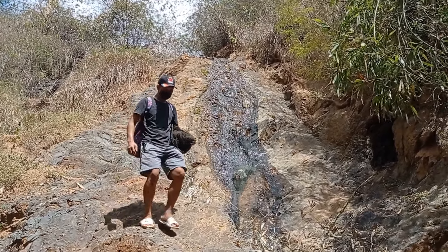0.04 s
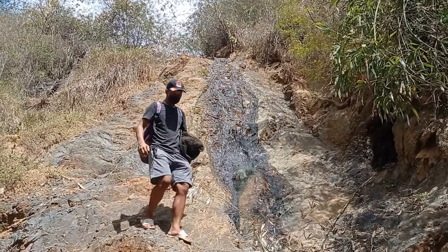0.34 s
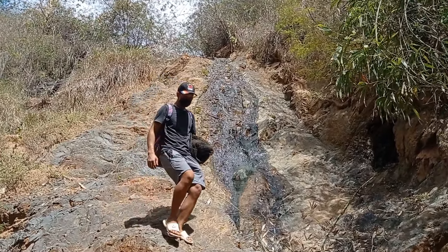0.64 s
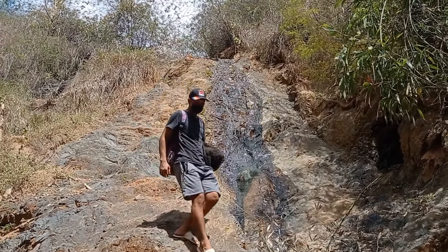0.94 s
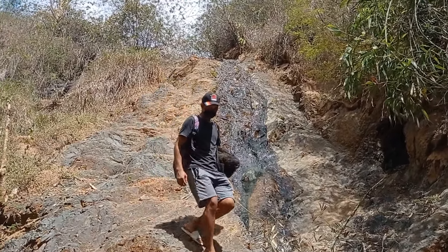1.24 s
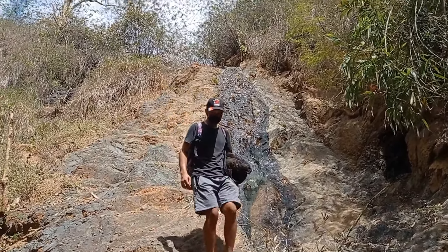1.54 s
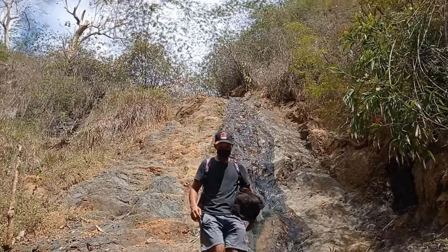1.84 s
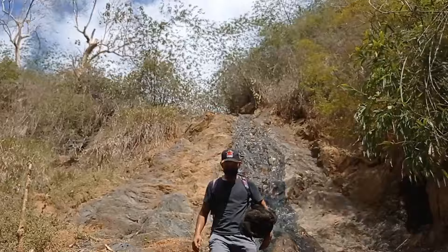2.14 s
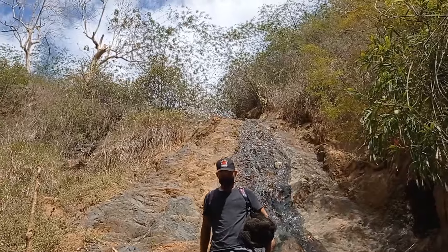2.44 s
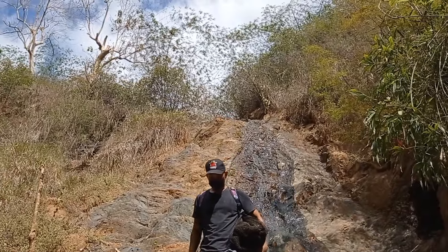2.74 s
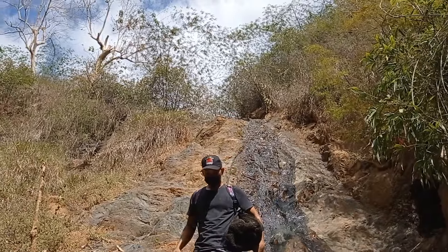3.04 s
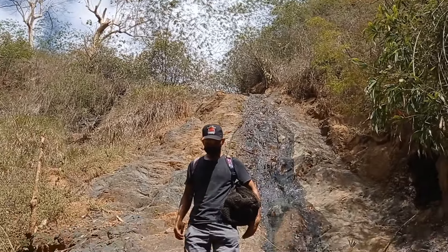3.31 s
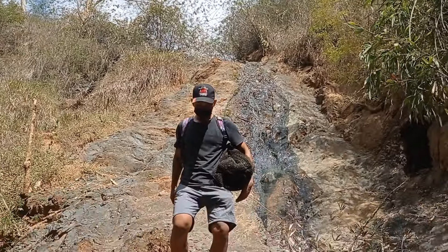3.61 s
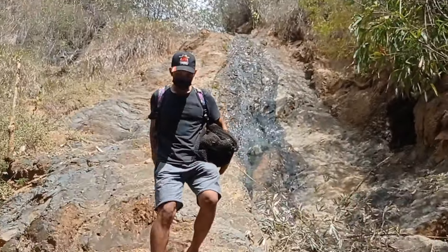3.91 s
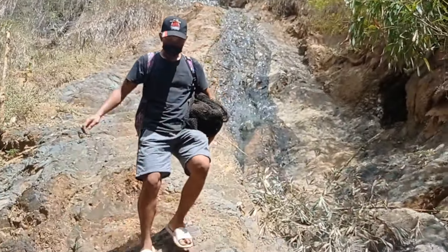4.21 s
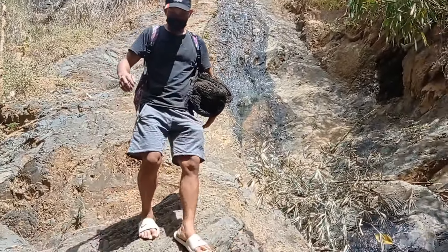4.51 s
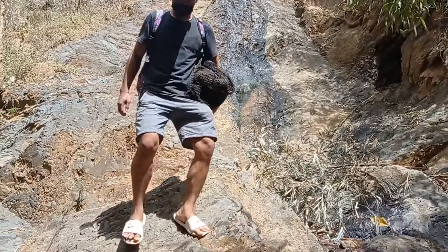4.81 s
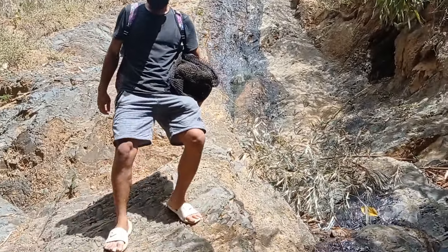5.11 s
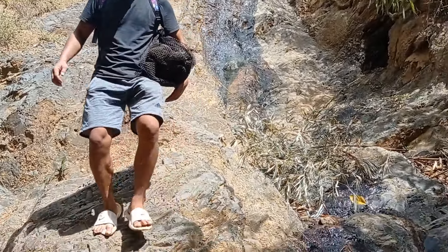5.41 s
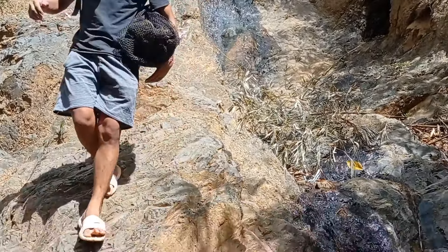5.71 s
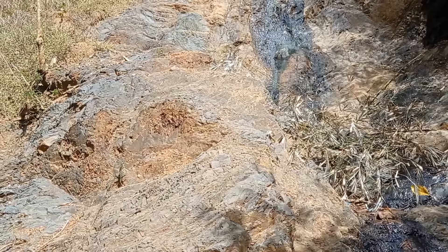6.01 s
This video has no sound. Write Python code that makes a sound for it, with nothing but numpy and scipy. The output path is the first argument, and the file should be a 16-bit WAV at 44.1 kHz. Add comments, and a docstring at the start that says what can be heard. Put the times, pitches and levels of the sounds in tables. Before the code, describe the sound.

A thin stream runs down a rock face outdoors, hissing and tinkling, with single drops plinking and soft gurgles from a hollow. Someone walks down the stone in rubber sandals: a light step, then one hard slap and a scuff with a short echo, later a few faint steps. A faint rumble of open air lies underneath. Near the end the sound cuts out briefly and fades back in.

```python
"""A thin stream hisses and tinkles down a rock face outdoors: trapped bubbles ring, spray ticks on the
stone, single drops plink, and a hollow gurgles as water churns the air inside it.
Someone walks down the slab in rubber slides; one sole slaps hard and scuffs, and the gully echoes it.
Faint open air rumbles underneath. Near the end the sound drops out for a moment and fades back in."""
import sys
import numpy as np
from scipy import signal
from scipy.fft import rfft, irfft
from scipy.io import wavfile
from scipy.ndimage import uniform_filter1d

SR = 44100
rng = np.random.default_rng(int(sys.argv[2]) if len(sys.argv) > 2 else 0)


def to_wav(sig):
    """Store sig (one row per channel, or 1-D mono) as 16-bit WAV at the path in sys.argv[1].

    Samples outside -1..1 are clipped; the rate is SR.
    """
    pcm = np.clip(np.atleast_2d(sig), -1, 1) * 32767
    pcm = np.round(pcm).astype(np.int16)
    wavfile.write(sys.argv[1], SR, pcm.T)  # frames by channels


N = 271195
T = np.arange(N) / SR

# Loud gulps of air in the hollow. Each row: start in seconds, relative level in dB, pitch in Hz,
# time scale of the swell in seconds.
GULPS = [(0.206, -50, 850, 0.005), (0.214, -48.5, 410, 0.013), (1.601, -50.5, 386, 0.014),
         (1.617, -41.5, 680, 0.0066), (1.799, -45, 860, 0.0054), (2.087, -41.5, 690, 0.012),
         (2.117, -49.5, 436, 0.014), (2.16, -49, 590, 0.016), (2.699, -46.5, 1170, 0.012),
         (2.926, -52, 825, 0.013), (3.101, -53, 352, 0.013), (3.561, -50, 380, 0.011),
         (3.679, -43, 590, 0.0086), (4.277, -46.5, 490, 0.015), (4.832, -53, 680, 0.011),
         (5.269, -48.5, 553, 0.018), (5.331, -50, 420, 0.013), (5.486, -50.5, 690, 0.0093),
         (5.653, -51.5, 780, 0.0073), (5.699, -44.5, 634, 0.0081)]


def stream(hiss_db=-52, tinkle_db=-55, spray_db=-57, flicker_db=2.12, surge_db=1.0, lowest_hz=820):
    """A sheet of water hisses and splashes; bubbles tinkle in it and fine spray ticks on the stone."""
    # The stream's fader moves. Each row: time in seconds, then gains in dB for the sheet of water,
    # the spray, the crevice, and the splashes within the sheet.
    faders = [(0, 0.5, 2, 0, 0.5), (.5, 0, 0.5, 0.5, 0.5), (1.2, 0, 3, 0.5, -0.5), (2.4, 0.5, 1.5, 5, -1),
              (3.1, 0.5, -2, 2.5, -1.5), (4.2, .5, 3.5, -2, 1), (5.3, .7, 2, -6, 1.5),
              (6.15, -2, -3.5, -13, 2.5)]
    # Tone of the hiss. Each row: frequency in Hz, gain in dB.
    hiss_tone = [(300, -43), (600, -3), (1000, -4), (1600, 1.5), (2400, 2.5), (3200, 1), (5000, -3),
                 (6300, 1), (8000, -8), (15500, -10.5)]
    times, *columns = np.transpose(faders)
    sheet_gain, spray_gain, crevice_gain, splash_gain = (undb(np.interp(T, times, c)) for c in columns)
    hiss = unit(colour(rng.standard_normal(N), hiss_tone)) * undb(hiss_db + flicker_db * wander(45))
    splashes = bubbles(count=2800, low_hz=973, high_hz=2397, cycles=3, spread_db=1) * undb(-57)
    tinkle = bubbles(count=4400, low_hz=1517, high_hz=3615, cycles=4.5, spread_db=3)
    tinkle *= undb(tinkle_db + surge_db * wander(9.6))
    spray = bubbles(count=7500, low_hz=3306, high_hz=7660, cycles=6, spread_db=5.5)
    spray *= undb(spray_db + surge_db * wander(9.8))
    ticks = bubbles(count=3200, low_hz=7730, high_hz=15100, cycles=9, spread_db=5) * undb(-62)
    # drips that fall in one narrow crevice all ring at its pitch
    drips = bubbles(count=700, low_hz=2116, high_hz=2700, cycles=2.3, spread_db=2)
    crevice = unit(resonate(drips, hz=2330, width_hz=190)) * undb(-61)
    sheet = hiss + splash_gain * splashes + tinkle
    water = sheet_gain * sheet + spray_gain * (spray + ticks) + crevice_gain * crevice
    # a thin film of water traps no large, low bubbles
    return signal.sosfilt(signal.butter(4, lowest_hz, "high", fs=SR, output="sos"), water)


def bubble(hz, cycles, rise=0.037, attack_cycles=0.31):
    """An air pocket rings, decaying by 1/e in `cycles`; its pitch climbs as it nears the surface."""
    turns = np.arange(int(6 * cycles * SR / hz)) * hz / SR
    envelope = np.exp(-turns / cycles) * (1 - np.exp(-turns / attack_cycles))
    phase = 2 * np.pi * turns * (1 + rise * turns / cycles / 2)
    return envelope / envelope.max() * np.sin(phase)


def bubbles(count, low_hz, high_hz, cycles, spread_db):
    """Many bubbles ring at random moments, most quiet and a few loud."""
    out = np.zeros(N)
    for when, pitch, size, ring in rng.random((count, 4)):
        gain = undb(spread_db * min(-np.log(1 - size), 3.4))
        hz = low_hz * (high_hz / low_hz) ** pitch
        add(out, when * N / SR, gain * bubble(hz, cycles * (.5 + ring)))
    return unit(out)


def drop(db, hz, cycles, splash_db=-12, splash_s=0.0021):
    """One drop: a tiny splash, and the trapped bubble rings."""
    t = T[:SR // 20]
    out = undb(splash_db) * rng.standard_normal(len(t)) * np.exp(-t / splash_s)
    add(out, 0, bubble(hz, cycles))
    return undb(db) * out


def drops(small_db=-40, scatter_db=6, treble_tilt_db=8, low_hz=1500, high_hz=9800, cycles=9):
    """A few loud drops stand out of a patter of smaller ones, whose high, short plinks peak harder."""
    # The loudest drops. Each row: start in seconds, level in dB, pitch in Hz, decay in cycles.
    loud_drops = [(0.4533, -33.5, 2790, 6.5), (0.799, -38.5, 1110, 8.8), (1.018, -34, 1380, 5.3),
                  (1.6746, -31.5, 2330, 12), (1.9152, -32.5, 2220, 6), (2.2787, -31.5, 2330, 11),
                  (2.3148, -37, 2400, 16), (2.8031, -30.5, 5850, 4), (2.894, -32, 14600, 20),
                  (3.141, -32.5, 5870, 6), (4.1327, -29, 5300, 3.7), (4.191, -40, 1200, 4.7),
                  (4.594, -30, 6560, 12), (4.887, -25.5, 5000, 3.4), (4.912, -33.5, 1300, 3.2),
                  (5.252, -38, 1326, 13), (5.2789, -37, 2730, 12.5), (5.407, -34, 1276, 5.7),
                  (5.741, -36, 1286, 11.6)]
    out = np.zeros(N)
    for start, db, hz, ring in loud_drops:
        add(out, start, drop(db, hz, ring))
    for when, size, pitch, ring in rng.random((44, 4)):
        db = small_db + scatter_db * (size - .5) + treble_tilt_db * (pitch - .5)
        hz = low_hz * (high_hz / low_hz) ** pitch
        add(out, when * N / SR, drop(db, hz, cycles * (.5 + ring)))
    return out


def hollow(ring_db=-9, gulp_db=-1, relative_width=0.29):
    """Water churns in a pocket in the rock; small bubbles and gulps of air ring the pocket."""
    # Air resonances of the hollow. Each row: pitch in Hz, bandwidth in Hz, gain in dB.
    air_modes = [(375, 42, 1), (574, 30, -6), (703, 90, 2), (804, 130, 3.5)]
    gulps, t = np.zeros(N), T[:SR // 5]
    for start, db, hz, length in GULPS:
        churn = rng.standard_normal(len(t)) * t / length * np.exp(-(t / length) ** 2)
        gulp = resonate(resonate(churn, hz, relative_width * hz), hz, 2 * relative_width * hz)
        add(gulps, start, undb(db + gulp_db) * unit_burst(gulp))
    small_bubbles = bubbles(count=2000, low_hz=336, high_hz=984, cycles=3, spread_db=3)
    ring = sum(undb(db) * resonate(gulps, hz, width) for hz, width, db in air_modes)
    murmur = sum(undb(db) * resonate(small_bubbles, hz, width) for hz, width, db in air_modes)
    return gulps + undb(ring_db) * ring + inflow() * unit(murmur)


def inflow(idle_db=-10, spurts_per_s=7, jitter=0.82, spurt_s=.035, refill_db=-8.5, refill_s=0.036):
    """The murmur's envelope: water enters the hollow in uneven spurts and rushes in after each gulp."""
    # How hard the water churns. Each row: time in seconds, level in dB.
    churn_levels = [(0, -64), (.4, -52), (.55, -68), (1.0, -58.5), (2.0, -61.5), (2.5, -64.5), (3.3, -66),
                    (4.1, -57.5), (4.9, -63), (5.35, -55.5), (5.8, -60.5), (6.15, -69)]
    spurts = np.full(N, undb(idle_db))
    for late in rng.uniform(-0.97, 1, (60, 2))[:, 0] * jitter / 2 + np.arange(60):
        centre = (late + .5) / spurts_per_s
        spurts += np.exp(-((T - centre) / spurt_s) ** 2)
    refill, t = np.zeros(N), T[:SR // 2]
    for start, db, _, length in GULPS:
        add(refill, start, undb(db + refill_db) * (1 - np.exp(-t / length)) * np.exp(-t / refill_s))
    churn_gain = undb(np.interp(T, *np.transpose(churn_levels)))
    return np.hypot(unit(spurts) * churn_gain, refill)


def footsteps(smack_db=-9, lowest_hz=230, grip_s=.0015, grit_s=0.021, thud_hz=115, thud_s=0.018):
    """A rubber sole slaps flat and rings; sand grinds under it and the heel thuds on the slab."""
    # Footfalls. Each row: start in seconds, level in dB, contact time in seconds, treble cutoff in Hz,
    # then grit and heel thud in dB relative to the slap.
    footfalls = [(0.238, -61, 0.028, 1500, -10, 6), (0.3103, -31.5, 0.0085, 1680, -17, -31),
                 (.335, -43, 0.0055, 1390, -22, -29), (1.1155, -15, 0.0099, 4840, -8.5, -57),
                 (1.172, -34, 0.006, 1500, -7, -31), (1.2626, -35, 0.014, 3000, 9.5, -24),
                 (3.137, -41.5, 0.0088, 2400, -12, -36), (4.035, -50, .018, 1700, 3, -4),
                 (4.277, -48, 0.023, 800, -17, -4), (4.59, -52.5, 0.0049, 3000, 10.5, -20),
                 (5.211, -59, 0.0091, 3000, 12, -2), (5.277, -41.5, 0.0063, 2800, -3.5, -22)]
    # Ring of a sole on stone. Each row: pitch in Hz, bandwidth in Hz, level in dB.
    sole_modes = [(240, 36, -26.5), (424, 61, -14.5), (632, 61, -7), (926, 90, -19.5), (1343, 170, -1.5),
                  (1700, 210, -6), (1925, 130, -1.5), (2360, 210, -10), (3020, 580, -12.5),
                  (3710, 180, -9.5), (4380, 330, -10), (5530, 530, -7)]
    # Tone of grinding sand. Each row: frequency in Hz, gain in dB.
    grit_tone = [(150, -29), (700, -3.5), (2500, -4.5), (4000, -1.5), (6000, 0), (9000, -4.5), (15500, -1)]
    out, t = np.zeros(N), T[:SR // 3]
    for start, db, contact_s, cutoff_hz, grit_db, thud_db in footfalls:
        force, sand, weight = rng.standard_normal((3, len(t)))
        # the slap lasts while the sole rolls flat; squeezed-out air hisses a little longer
        since_flat = np.maximum(t - contact_s, 0)
        blow = force * np.exp(-since_flat / .004)
        squeeze = force * np.exp(-since_flat / .011)
        ring = sum(undb(level) * unit_burst(resonate(blow, hz, width)) for hz, width, level in sole_modes)
        slap = ring + undb(smack_db) * unit_burst(resonate(squeeze, hz=2000, width_hz=3100))
        # a small sole radiates little bass, and a soft landing little treble
        slap = signal.sosfilt(signal.butter(4, lowest_hz, "high", fs=SR, output="sos"), slap)
        slap = signal.sosfilt(signal.butter(2, cutoff_hz, fs=SR, output="sos"), slap)
        grit = colour(sand * np.exp(-t / grit_s) * (1 - np.exp(-t / grip_s)), grit_tone)
        thud = resonate(resonate(weight * np.exp(-t / thud_s), thud_hz, 80), thud_hz, 120)
        step = unit_burst(slap) + undb(grit_db) * unit_burst(grit) + undb(thud_db) * unit_burst(thud)
        add(out, start, undb(db) * step)
    return out


def gully(x, wet_db, tail_s=.36, near_s=.1, near_db=8, predelay_s=.006):
    """Rough rock scatters the sound back: close faces first, then a thin tail."""
    t = T[:SR // 2]
    near = undb(near_db - 60 * t / near_s)
    tail = undb(-60 * t / tail_s)
    echo = rng.standard_normal(len(t)) * (near + tail) * (t > predelay_s)
    return x + undb(wet_db) * signal.fftconvolve(x, echo / np.linalg.norm(echo))[:N]


def open_air(level_db=-67):
    """A faint, steady rumble of outdoor air."""
    # Tone of the rumble. Each row: frequency in Hz, gain in dB.
    rumble_tone = [(20, -20), (40, -6), (70, 4.5), (130, 0.5), (220, -4.5), (400, -7), (1000, -23),
                   (4000, -40.5)]
    return unit(colour(rng.standard_normal(N), rumble_tone)) * undb(level_db)


def undb(db):
    """Decibels to gain."""
    return 10 ** (np.asarray(db) / 20)


def unit(x):
    """Scale to rms 1."""
    return x / np.sqrt(np.mean(x ** 2) + 1e-20)


def unit_burst(x):
    """Scale so that the loudest 10 ms have rms 1."""
    return x / np.sqrt(uniform_filter1d(x ** 2, size=441).max() + 1e-20)


def add(out, start_s, x):
    """Mix x into out from start_s on."""
    i = max(int(start_s * SR), 0)
    out[i:i + len(x)] += x[:max(len(out) - i, 0)]


def colour(x, points):
    """Minimum-phase EQ through (Hz, dB) points."""
    hz, db = np.transpose(points)
    bins_hz = np.maximum(np.fft.rfftfreq(4096, 1 / SR), 1)
    gain = undb(np.interp(np.log(bins_hz), np.log(hz), db))
    cepstrum = irfft(np.log(gain))
    half = len(cepstrum) // 2
    fold = np.r_[1, np.full(half - 1, 2), np.zeros(half)]
    impulse = irfft(np.exp(rfft(cepstrum * fold)))
    return signal.fftconvolve(x, impulse)[:len(x)]


def resonate(x, hz, width_hz):
    """One resonance, gain 1 at its centre."""
    return signal.lfilter(*signal.iirpeak(hz, hz / width_hz, fs=SR), x)


def wander(per_s):
    """A random drift of rms 1 that glides to a new value per_s times a second."""
    hold = int(SR / per_s)
    stairs = np.repeat(rng.standard_normal(N // hold + 1), hold)
    return unit(uniform_filter1d(stairs, hold)[:N])


def scene():
    """Water and steps echo in the gully, over a bed of open air."""
    air = open_air()
    water = gully(stream() + drops() + hollow(), wet_db=-12.5)
    steps = gully(footsteps(), wet_db=-7)
    return (water + steps + air)[None]


def record(dry, mute_at_s=5.825, top_hz=15750):
    """A small microphone dulls the treble; the sound cuts out briefly and fades back in."""
    # Tone of the microphone. Each row: frequency in Hz, gain in dB.
    microphone_tone = [(20, -8.5), (6500, 0.5), (7500, -3.5), (9500, -7), (11500, -17), (13200, -21.5),
                       (14300, -8.5), (15600, -13.5)]
    # The fade up after the dropout. Each row: time in seconds, gain in dB.
    fade_in = [(5.94, -32.5), (6.012, -16), (6.02, -10), (6.08, 1)]
    times, db = np.transpose(fade_in)
    fade = undb(np.interp(T, times, db)) * (T > times[0])
    heard = colour(dry[0], microphone_tone) * np.where(T < mute_at_s, 1, fade)
    return signal.sosfilt(signal.ellip(10, .2, 80, top_hz, fs=SR, output="sos"), heard)[None]


dry = scene()
out = record(dry)
to_wav(out)
```